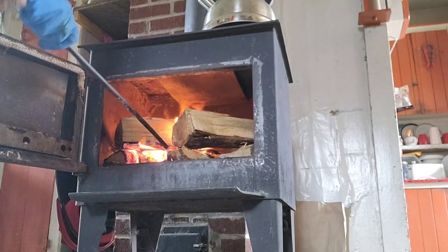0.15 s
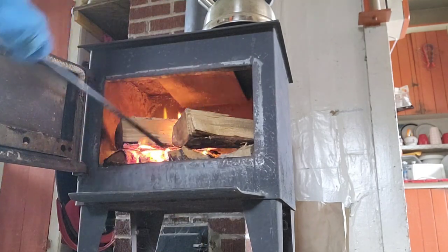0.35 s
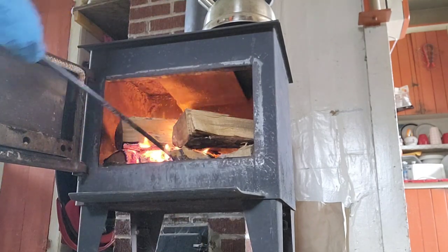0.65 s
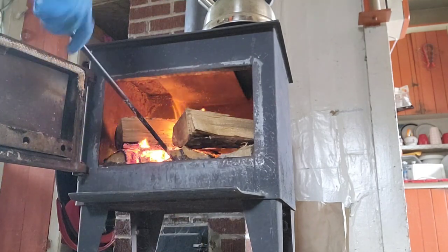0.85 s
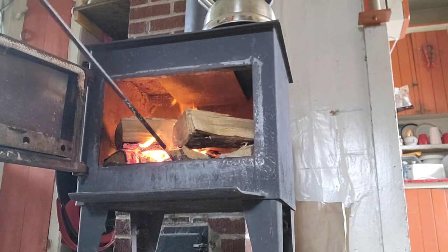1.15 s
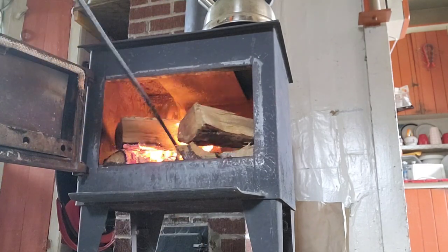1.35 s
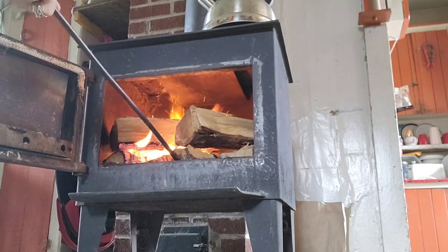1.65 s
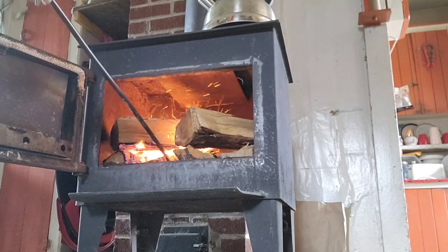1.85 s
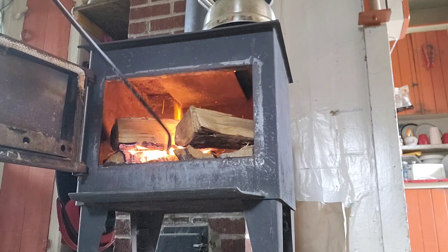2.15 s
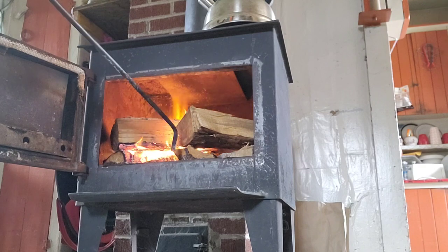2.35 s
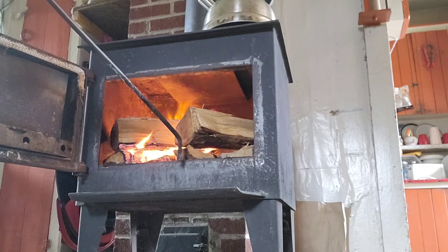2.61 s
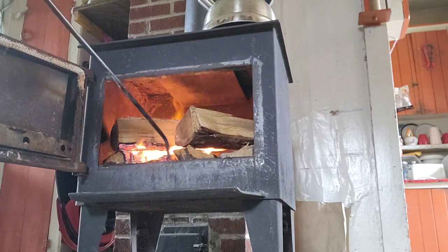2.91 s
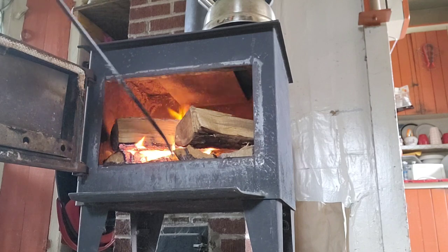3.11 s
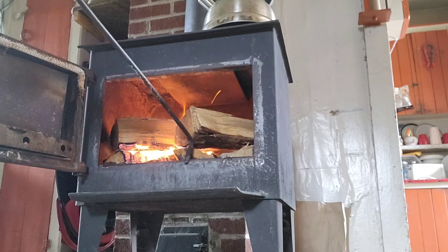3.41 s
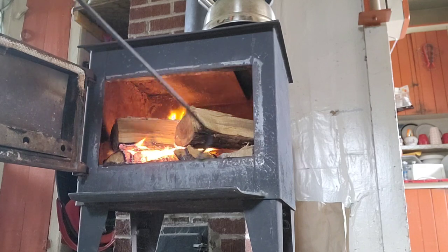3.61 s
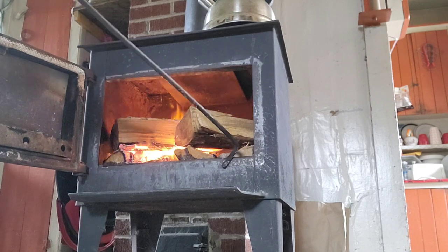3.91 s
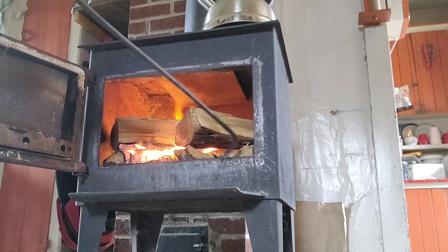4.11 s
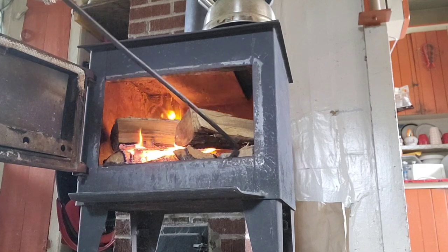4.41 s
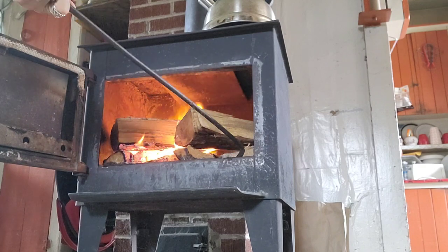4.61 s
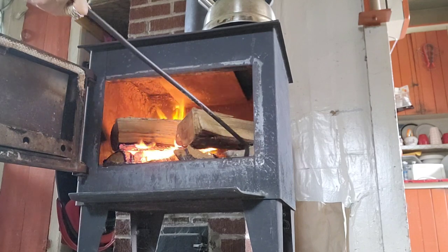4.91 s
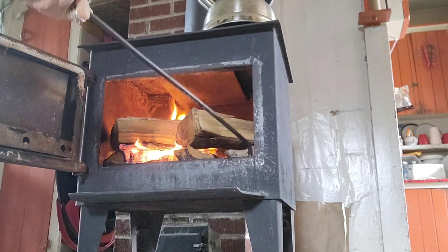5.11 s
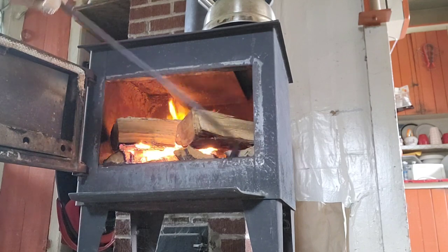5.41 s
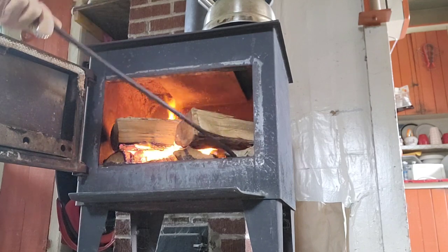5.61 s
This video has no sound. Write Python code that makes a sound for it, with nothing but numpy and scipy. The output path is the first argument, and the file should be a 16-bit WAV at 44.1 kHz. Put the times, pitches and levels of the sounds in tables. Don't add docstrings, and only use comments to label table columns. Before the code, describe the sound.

A steel poker works inside a wood stove indoors, heard in stereo from a phone a metre or two away. Low, fluttering draught rumbles under faint air hiss. From 0 to 1.6 s, quick raking strokes crunch and hiss through ash, with wood slips, small knocks and bright ember snaps, strongest near 1.5 s. At 1.62 s a hard blow on steel plate clangs loudest, bouncing once and ringing for under a second; the phone's gain control ducks fire and hiss, which slowly creep back. A faint log tap comes at 2.2 s, then a lighter ringing strike on the stove lip at 3.0 s. A knock at 3.7 s leads to a deep, hollow log thud at 4.02 s, with a short woody ring. Wood drags softly; a log rap lands at 4.65 s. Scraping, snaps and light knocks cluster around 5.1 s, followed by a fading rake near 5.6 s.

```python
import sys
import numpy as np
from scipy import signal
from scipy.fft import rfft, irfft
from scipy.io import wavfile
from scipy.ndimage import uniform_filter1d

SR = 44100
rng = np.random.default_rng(int(sys.argv[2]) if len(sys.argv) > 2 else 0)


def log_audio(samples):
    frames = np.atleast_2d(samples).T
    limited = np.clip(frames, -1, 1)
    pcm = np.round(limited * 32767).astype(np.int16)
    wavfile.write(sys.argv[1], SR, pcm)


def field_ratio(decibels):
    return 10 ** (np.asarray(decibels, dtype=float) / 20)


N = 253719
TIME = np.arange(N) / SR
HZ = np.maximum(np.fft.rfftfreq(N, 1 / SR), 1)


def on_hz(table):
    hz, value = np.transpose(table)
    return np.interp(np.log(HZ), np.log(hz), value)


# [f/Hz, likeness/0-1]
LIKENESS = [(60, 1.0), (130, 0.99), (290, 0.85), (640, 0.71), (1410, 0.08), (3100, 0.27), (6820, 0),
            (15000, -0.12)]


def pair(gain):
    like = np.clip(on_hz(LIKENESS), 0, 1)
    mid, side = rfft(rng.standard_normal((2, N))) * gain
    mid, side = mid * np.sqrt(1 + like), side * np.sqrt(1 - like)
    x = irfft(np.array([mid + side, mid - side]), N)
    return x / np.sqrt(np.mean(x ** 2))


def band(lo_hz, hi_hz):
    return 1 / np.sqrt((1 + (lo_hz / HZ) ** 6) * (1 + (HZ / hi_hz) ** 6))


def walk(rate_hz):
    hold = int(SR / rate_hz)
    steps = np.repeat(rng.standard_normal(N // hold + 1), hold)
    return 1.16 * uniform_filter1d(uniform_filter1d(steps, hold), hold)[:N]


def fade(t, t60):
    return (t >= 0) * field_ratio(-60 * np.maximum(t, 0) / t60)


def press(peak_s, rise_s, fall_s, db):
    drop_db = 20 * np.maximum((peak_s - TIME) / rise_s, (TIME - peak_s) / fall_s)
    return field_ratio(db - drop_db)


# [peak t/s, rise/s, fall/s, ash hiss level/dB, wood drag above hiss/dB]
STROKES = [(.075, .02, .1, -48, -1), (.15, 0.068, 0.054, -38.5, -5), (.268, 0.096, .09, -42.5, 3.5),
           (.36, .08, 0.07, -54, -1), (.425, 0.0079, 0.23, -39, -2.5), (.567, 0.028, 0.15, -46.5, -3),
           (.78, 0.09, 0.32, -54, -1.5), (.988, .11, 0.15, -38.5, -17), (1.175, 0.026, 0.14, -36.5, -17),
           (1.205, 0.073, 0.1, -34, -24), (1.303, 0.041, .07, -34, -19), (1.39, 0.14, .12, -45, -4),
           (1.502, 0.2, .07, -31.5, -6), (1.585, 0.28, 0.047, -34, -6), (3.56, .04, 0.11, -53, -10),
           (3.665, .02, .11, -56, 0), (4.16, 0.11, 0.2, -54, 13.5), (4.29, .15, 0.23, -58, -9),
           (4.83, .2, 0.093, -50.5, -3), (5.064, 0.23, 0.11, -42, -6.5), (5.11, .02, 0.063, -40, -4),
           (5.165, 0.037, 0.16, -44, 6.5), (5.3, .08, .2, -52.5, -5), (5.615, 0.056, 0.4, -45.5, -7)]
# [peak t/s, rise/s, fall/s, level/dB]
DRAGS = [
    (0.307, .03, 0.11, -46.5),
    (0.494, .1, 0.18, -43.5),
    (0.605, .1, 0.073, -51),
    (5.2, .08, .07, -39.5),
    (1.45, .1, .2, -42.5),
]
# [f/Hz, level/dB]
ASH = [(880, -45), (1500, -29), (1790, -11.5), (2570, -8.5), (3040, -4), (3350, -7.5), (4410, -6),
       (4720, -2), (5160, -6.5), (6590, -8.5), (8010, -1), (9460, -11.5), (11900, -13), (14000, -3),
       (15600, -13.5)]


def rake():
    hiss, drag = np.zeros(N), np.zeros(N)
    for peak_s, rise_s, fall_s, hiss_db, drag_db in STROKES:
        push = press(peak_s, rise_s, fall_s, hiss_db)
        hiss, drag = np.hypot(hiss, push), np.hypot(drag, push * field_ratio(drag_db))
    for row in DRAGS:
        drag = np.hypot(drag, press(*row))
    ash = field_ratio(on_hz(ASH))
    grains = field_ratio(2.65 * walk(500) + walk(60) - 2.5)
    coarse = field_ratio(-1.0) * pair(ash * band(1000., 9700.0))
    dust = field_ratio(2.5 * walk(18) - 3.0) * pair(ash * band(10500., 18000.))
    slips = field_ratio(2.9 * walk(120) + 1.5 * walk(30.06) - 4.0)
    return hiss * grains * (coarse + dust) + drag * slips * pair(band(440.0, 1500.0))


# [t/s, peak level/dB, sizzle above peak/dB]
EMBERS = [(0.422, -32.5, 1), (.4364, -42, -7), (.567, -43.5, 11), (0.982, -47.5, 10), (1.0225, -46, 7),
          (1.1567, -48.5, 12), (1.1651, -43.5, 8.5), (1.2785, -40, 7), (1.497, -31.5, 8), (1.5616, -29, -1),
          (1.9575, -58.5, 5), (2.9247, -59, 10), (3.411, -61, 12), (3.6011, -64.5, 16), (4.5592, -48, 5.5),
          (5.1073, -37.5, -2), (5.6011, -45, 3)]
# [t/s, peak level/dB, knock above peak/dB, thud above peak/dB]
LOGS = [(.0692, -39.5, -7.5, 4), (.2384, -43, 7, 7), (1.3828, -36, -11, 8), (1.4116, -30, -15.5, 0.5),
        (2.1744, -46.5, -7, -10), (3.0216, -42, 4, -4), (3.6586, -35, -7.5, -5), (4.0226, -26.5, 8, 7),
        (4.071, -37, 12.5, 7), (4.6527, -32.5, 3.5, 3.5), (5.1233, -32.5, -7, -4), (5.148, -37, 4, 0)]
# [t/s, peak level/dB, knock above peak/dB, sizzle above peak/dB, tail length/share]
BLOWS = [
    (1.6192, -7.5, -31, -8, .58),
    (1.6444, -19.5, -9, -18, 0.88),
    (2.997, -21, -13.5, -17, 0.3),
    (3.0005, -19, -4.5, -27, 0.75),
]


def contacts():
    embers = [(s, db, -10.5, sizzle_db, 0.5, 0.73) for s, db, sizzle_db in EMBERS]
    logs = [(s, db, knock_db, -17, thud_db, 0.88) for s, db, knock_db, thud_db in LOGS]
    blows = [(s, db, knock_db, sizzle_db, -24, tail) for s, db, knock_db, sizzle_db, tail in BLOWS]
    return embers + logs + blows


# [low edge f/Hz, high edge f/Hz, room tail t60/s, tail above crack/dB, delay/s, tilt/dB per octave]
PARTS = [
    (1400, 5700, 0.32, 0.5, 0.0025, -4),
    (591, 990, 0.33, 2.5, 0.00024, 2.5),
    (5500, 11000, 0.29, 6.5, 0.00062, -2.5),
    (101, 500, 0.31, 4.5, 0.00397, -1.2),
]


def knocks():
    out, t = np.zeros((2, N)), TIME[:SR // 2]
    for k, (lo_hz, hi_hz, t60, tail_db, delay_s, tilt_db) in enumerate(PARTS):
        shape, clicks = np.zeros(N + SR), np.zeros(N)
        for s, peak_db, *colour_db, length in contacts():
            size = field_ratio(peak_db + ([0] + colour_db)[k])
            crack = fade(t - delay_s, 0.015)
            tail = field_ratio(tail_db) * fade(t - delay_s, t60 * max(length, .05))
            i = int(s * SR)
            shape[i:i + len(t)] += field_ratio(-12.5) * size * (crack + tail)
            clicks[i + int(delay_s * SR)] += size * field_ratio(-5) * SR / (hi_hz - lo_hz) / 2
        ash = field_ratio(.5 * on_hz(ASH)) if lo_hz > 4000 else 1
        colour = band(lo_hz, hi_hz) * ash * field_ratio(tilt_db * np.log2(HZ))
        out += shape[:N] * field_ratio(1.5 * walk(200)) * pair(colour)
        sos = signal.butter(2, (lo_hz, hi_hz), "band", fs=SR, output="sos")
        out += signal.sosfilt(sos, clicks)
    return out


def ring(hit_s, hit_db, modes, rise_s, count=4):
    start = int(hit_s * SR)
    t = np.maximum(TIME - hit_s, 0)[start:int((hit_s + .8) * SR)]
    chance, sound = rng.standard_normal((len(modes), count, 3)), 0
    for (hz, mode_db, t60), cluster in zip(modes, chance):
        for k, (phase, detune, apart) in enumerate(cluster):
            size, spread = (.5, .018) if k else (.8, 0)
            ports = apart * min(hz / 2500, 1.5) * np.array([[.5], [-.5]])
            turn = 2 * np.pi * hz * (1 + spread * detune) * t + 3 * phase + ports
            sound = sound + size * field_ratio(mode_db) * fade(t, t60) * np.sin(turn)
    out = np.zeros((2, N))
    out[:, start:start + len(t)] = field_ratio(hit_db) * (1 - np.exp(-t / rise_s)) * sound
    return out


# [f/Hz, level/dB, t60/s]
PLATE = [(893, -8, 0.4), (985, -3, 0.32), (1040, -16, 0.63), (1172, 0.5, 0.27), (1630, -3.5, 0.31),
         (1848, -4, 0.28), (2175, 5, 0.22), (2405, 6, 0.17), (2670, -10.5, 0.21), (2860, -8.5, 0.084),
         (3400, -8.5, 0.23), (3531, -15, 0.34), (4370, -1.5, 0.24), (4930, -8.5, 0.18), (4670, -8.5, 0.15),
         (4877, -12.5, 0.2), (5100, -4.5, 0.12), (5580, -6.5, 0.14)]
LIP = [(381, -0.5, 0.35), (846, 4, 0.35), (1072, -6.5, 0.49), (1147, -2, 0.33), (1550, -4, 0.31),
       (3210, -2, 0.17), (3600, -16, 0.2), (3750, -22, 0.32), (4040, -25.5, 0.15), (4380, -8, 0.22),
       (4600, -19.5, 0.18)]
TAP = [(550, 2.5, 0.1), (860, -3, .09), (1090, 5, 0.09), (1750, 0.5, 0.086)]
ROD = [(1039, -1, .8), (2206, 4, .5), (889, -5.5, .45), (1239, -3.5, .35)]


def steel():
    plate = ring(1.620, -27, PLATE, rise_s=.0012)
    lip = ring(3.001, -35.5, LIP, rise_s=.0015)
    tap = ring(5.149, -40, TAP, rise_s=0.00061)
    rod = ring(1.620, -33, ROD, rise_s=.002, count=1)
    return plate + lip + tap + rod


# [f/Hz, level/dB, t60/s]
LOG = [(240.4, -7.5, 0.24), (347, -8.5, 0.35), (544, -9.5, 0.38), (698, 0, 0.094), (880, 5.5, 0.086),
       (970, -3.5, 0.25)]


def log_ring():
    return ring(4.023, -22, LOG, rise_s=0.00083)


# [f/Hz, level/dB, t60/s]
LIP_LINES = [(884, 1, .3), (1800, 2, .09), (2790, -1, .08), (1600, -5, 0.18)]
LOG_LINES = [(910, 0, .06), (2800, -10, 0.045)]
RAP = [(1770, 0.5, 0.037), (1400, -8.5, .1), (833, -3.5, 0.065), (614, -3.5, 0.11)]


def lines():
    hits = (3.0, -32.5, LIP_LINES), (4.0225, -18, LOG_LINES), (4.653, -25.5, RAP)
    return sum(ring(s, db, modes, rise_s=0.00052, count=1) for s, db, modes in hits)


# [f/Hz, width/Hz, level/dB, t60/s]
WALLS = [(904, 49, -4.5, 0.6), (1030, 40, -3.5, 0.64), (1230, 81, 2, 0.34), (2210, 110, -10, 0.5),
         (2090, 900, -17, 1.25), (1070, 450, -13.5, 1.4)]
BLOW_S = [
    1.62,
    3.001,
    4.024,
    5.16,
]
# [level/dB, brightness/dB per octave, clear lines/dB]
WALL_BLOWS = [
    (-32, 1, -1.5),
    (-41, -2, 2),
    (-34, -29, -1),
    (-50, -9, -14),
]


def walls():
    out = 0
    for hz, width_hz, db, t60 in WALLS:
        shape = 0
        for s, (blow_db, tilt_db, line_db) in zip(BLOW_S, WALL_BLOWS):
            colour_db = tilt_db * np.log2(hz / 1000) + line_db * (width_hz < 200)
            shape = shape + field_ratio(db + blow_db + colour_db) * fade(TIME - s, t60)
        out = out + shape * pair(1 / (1 + ((HZ - hz) / (width_hz / 2)) ** 2))
    return out


# [t/s, peak level/dB,
# f/Hz]
TICKS = [(0.15, -31, 4200), (0.2644, -33, 8010), (0.4364, -25, 8140), (0.567, -34, 6310),
         (1.1657, -28, 8420), (1.3036, -25, 7940), (1.4973, -16.5, 8200), (4.7101, -35, 8370),
         (5.1238, -29, 7810), (5.6027, -34, 7830),
         (0.4208, -25, 15000), (0.567, -28, 11400), (0.982, -23, 14270), (1.0221, -33.5, 12400),
          (1.2037, -30, 14660), (1.497, -18.5, 13700), (1.5612, -24, 13880), (5.1082, -28, 14300)]


def ticks():
    out, t = np.zeros((2, N)), TIME[:SR // 40]
    snaps = TICKS
    for (s, db, hz), noise in zip(snaps, rng.standard_normal((len(snaps), 2, len(t)))):
        edges_hz = np.minimum((hz / 1.03, hz * 1.2), .45 * SR)
        sos = signal.butter(1, edges_hz, "band", fs=SR, output="sos")
        snap = signal.sosfilt(sos, noise * fade(t, 0.014))
        i = int(s * SR)
        out[:, i:i + len(t)] += field_ratio(db) * snap / np.abs(snap).max()
    return out


THUD_S = [.428, 1.383, 1.392, 1.497, 3.04, 3.66, 4.033, 4.6527]
# [f/Hz, level/dB, length/s]
THUDS = [(133.5, -29, 0.041), (286, -27, 0.014), (452, -32, 0.024), (144, -23.5, 0.0265),
         (340, -30.5, 0.013), (597, -37.5, 0.012), (124.3, -13.5, 0.029), (745, -21.5, 0.0019)]


def thuds():
    out = np.zeros(N)
    for s, (hz, db, length_s) in zip(THUD_S, THUDS):
        t = np.maximum(TIME - s, 0)
        shape = np.exp(-(t / length_s) ** 3) * (1 - np.exp(-t * hz * 3.3))
        out += field_ratio(db) * shape * np.sin(2 * np.pi * hz * t)
    return out


# [f/Hz, level/dB per Hz]
FIRE = [(20, -27), (40, -23), (57, -7), (65, 0), (74, -9), (105, -15), (150, -9), (200, -22.5), (270, -22),
        (325, -15.5), (400, -29.5), (580, -29.5), (800, -47.5), (1600, -58.5)]
# [t/s, level/dB]
DRAUGHT = [(0, -33), (.36, -39), (.46, -33), (.86, -41), (.96, -35), (1.45, -35), (1.55, -32.5),
           (1.75, -44), (2.1, -38), (2.85, -39), (3.3, -36), (3.9, -40.5), (4.05, -33.5), (4.8, -37),
           (5.15, -37.5), (5.3, -31), (5.4, -37.5), (5.75, -34)]


def fire(gain):
    colour, out = field_ratio(on_hz(FIRE)), 0
    swell = gain * field_ratio(np.interp(TIME, *np.transpose(DRAUGHT)) + 3.0 + 1.5 * walk(7))
    for hz in 2. ** np.arange(4, 12):
        share = np.clip(1 - np.abs(np.log2(HZ / hz)), 0, 1) ** .5 * colour
        level = swell if hz < 100 else field_ratio(-36.5) * gain
        flutter = field_ratio(0.65 * walk(12))
        out = out + level * np.sqrt(np.sum(share ** 2)) * flutter * pair(share)
    return out / np.sqrt(np.sum(colour ** 2))


# [f/Hz, level/dB per Hz]
AIR = [(600, -39.5), (900, -9.5), (1150, -16), (1400, -25.5), (1800, -10), (2400, -17.5), (2900, -6.5),
       (3800, -4.5), (5900, -7), (8200, -1.5), (10600, -10.5), (13000, -5.5), (15000, -3), (15600, -15)]


def air(gain):
    return gain * field_ratio(-49 + 0.99 * walk(12)) * pair(field_ratio(on_hz(AIR)))


def ducking():
    duck_s, duck_db, attack_s, creep_db_per_s = 1.615, -14.5, .03, 2.5
    hold_s, release_s, rest_db, settled_db = 1.395, 0.14, 0.65, -1.22
    t = np.maximum(TIME - duck_s, 0)
    held_db = np.minimum(duck_db + creep_db_per_s * t, 0) * (1 - np.exp(-t / attack_s))
    released = .5 + .5 * np.tanh((t - hold_s) / release_s / 2)
    return field_ratio((rest_db + held_db) * (1 - released) + settled_db * released)


def scene():
    gain = ducking()
    poker = rake() + knocks() + steel() + log_ring() + lines() + walls() + ticks() + thuds()
    return poker + fire(gain) + air(gain)


def roll_off(x):
    return signal.sosfilt(signal.butter(12, 16660, fs=SR, output="sos"), x)


# [f/Hz, left minus right/dB]
PORTS = [(60, 0.5), (200, 0.5), (400, 1.9), (1000, 0.7), (2400, 5.5), (4400, 1), (8000, -8), (13000, 5)]


def record(dry):
    lag_s, top_hz = 5e-5, 15700
    half = field_ratio(on_hz(PORTS) / 2) * np.exp(-1j * np.pi * HZ * lag_s)
    x = irfft(rfft(dry) * np.array([half, 1 / half]), N)
    x = .6 * np.tanh(x / .6)
    top = field_ratio(-38 * np.clip((HZ - top_hz) / 250 + .5, 0, 1))
    return roll_off(irfft(rfft(x) * top, N))


dry = scene()
out = record(dry)
log_audio(out)
```